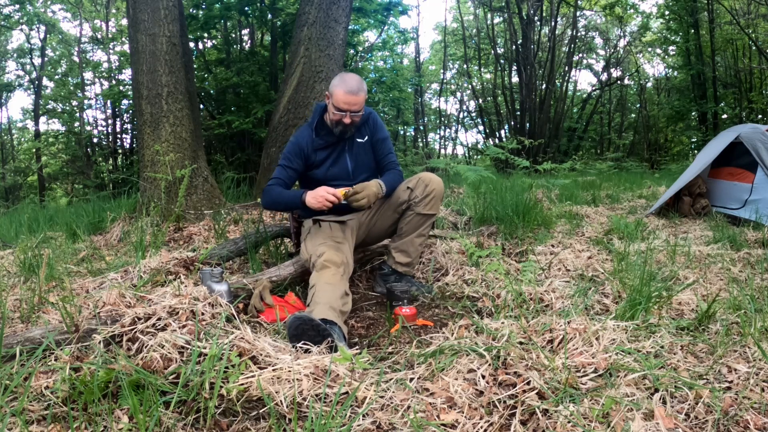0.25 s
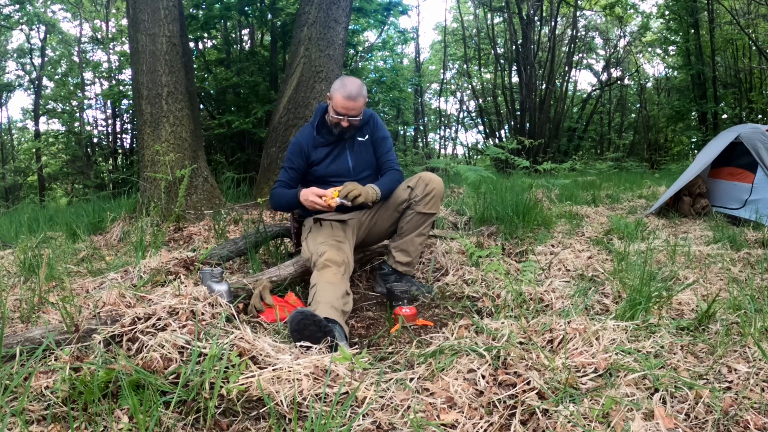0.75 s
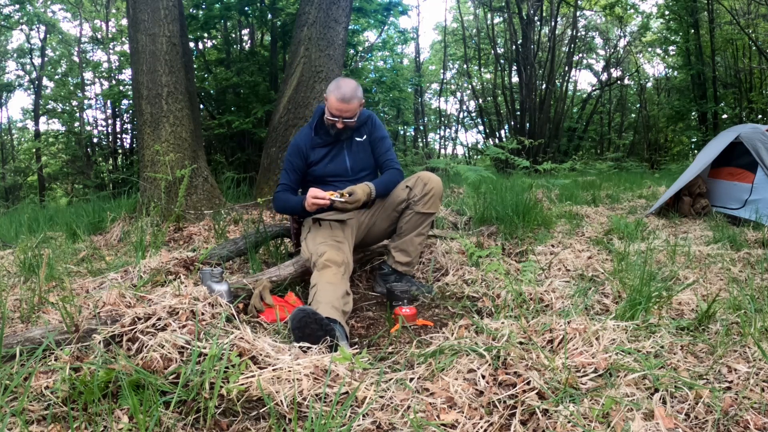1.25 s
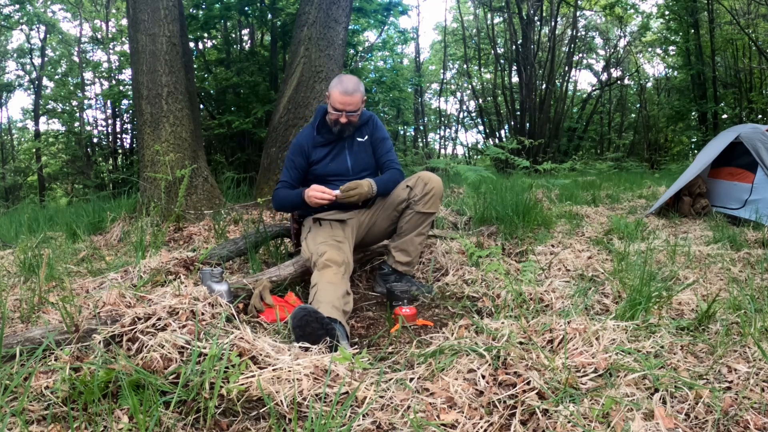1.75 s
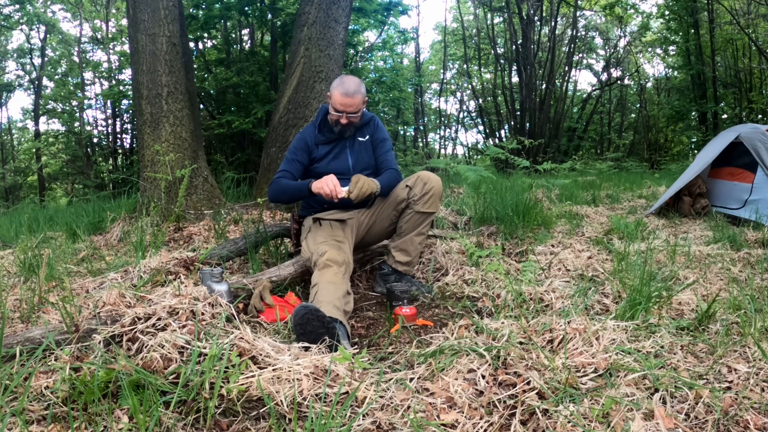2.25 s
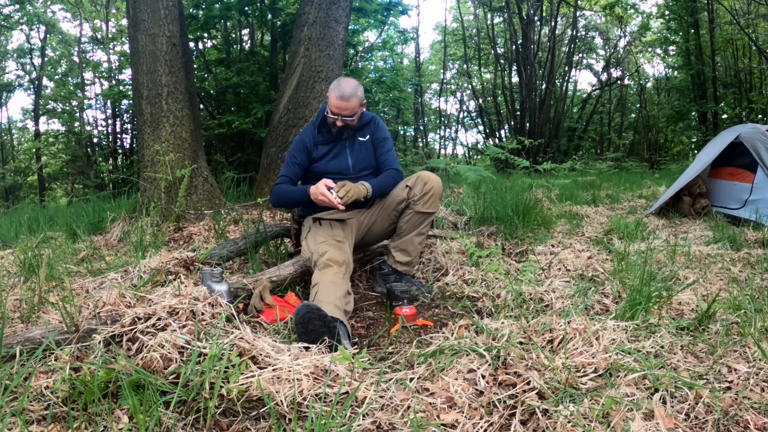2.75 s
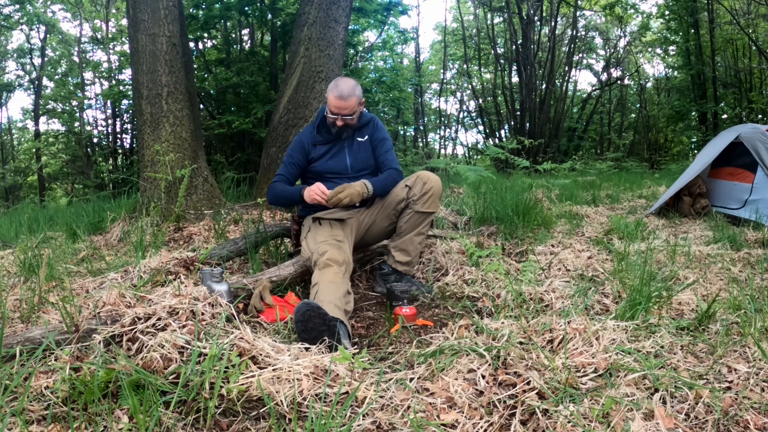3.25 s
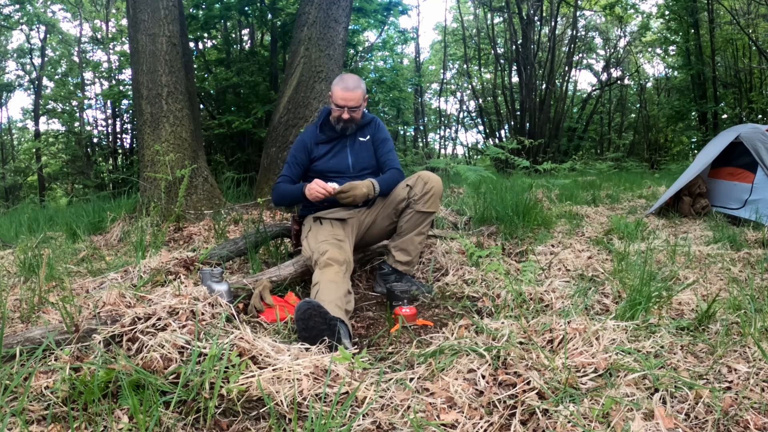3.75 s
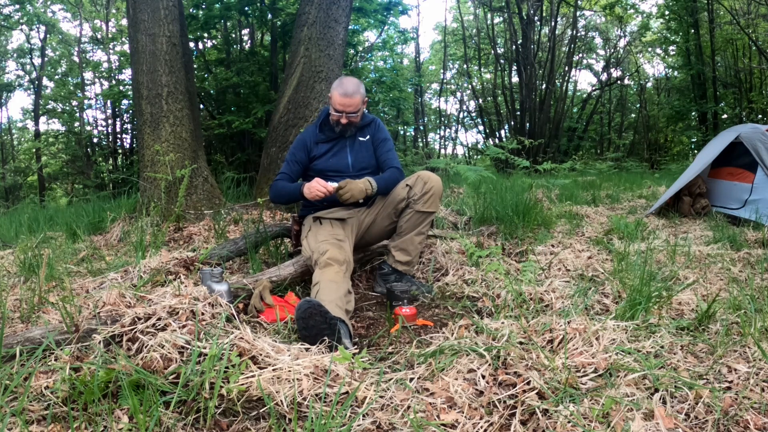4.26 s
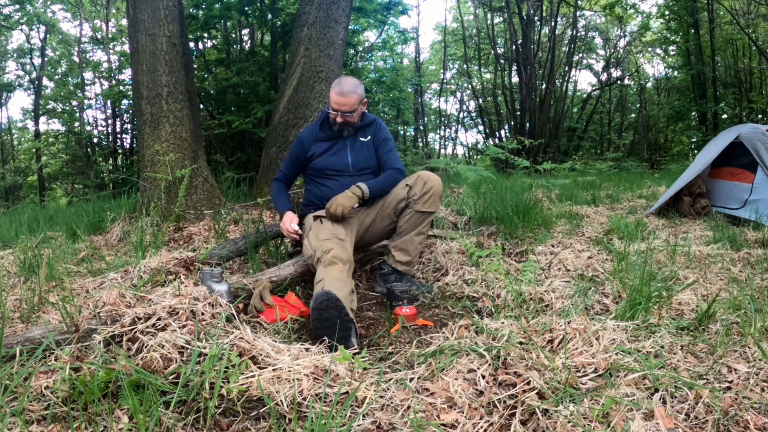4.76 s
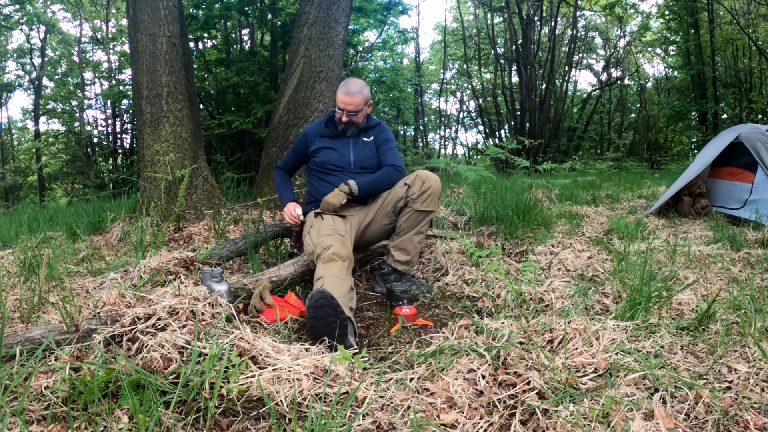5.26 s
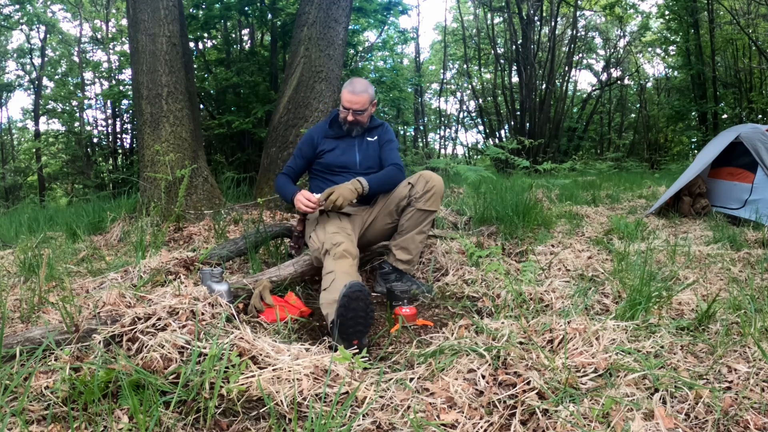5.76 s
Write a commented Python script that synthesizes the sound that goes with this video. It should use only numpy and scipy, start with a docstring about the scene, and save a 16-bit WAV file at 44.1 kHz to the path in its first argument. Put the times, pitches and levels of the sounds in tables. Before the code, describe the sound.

Sharp crinkling of a thin plastic wrapper being folded outdoors, busy at first, fading after four seconds to sparse clicks and soft nylon swishes.

```python
"""Someone in a quiet wood folds and crumples a packet wrapper, a few metres from a small stereo camera.
From the start creases snap as short panel swings and sharp noise ticks, over a crackle of tiny creases.
Diffuse, quickly fading echoes from leaf litter and trunks follow; soft noise thuds are knocks on the knee.
After some four seconds the snaps are few and faint, and from about five a jacket sleeve rustles as noise.
Filtered noise throughout gives still air, a faint distant rumble and a light breeze at the ports."""
import sys
import numpy as np
from scipy import signal
from scipy.fft import rfft, irfft
from scipy.io import wavfile

SR = 44100
rng = np.random.default_rng(int(sys.argv[2]) if len(sys.argv) > 2 else 0)


def write(x):
    x = np.atleast_2d(x).T
    wavfile.write(sys.argv[1], SR, np.round(np.clip(x, -1, 1) * 32767).astype(np.int16))


N = 264600
TIME = np.arange(N) / SR  # s
LEVEL_WINDOW = .003 * SR  # samples over which the level of a short sound is taken

# Light stirring of the film between squeezes, fading as the packet is folded small.
# Each row: time in seconds, panel level in dB before trims.
STIRRING = [(0, -51), (.55, -58), (1.05, -52.5), (1.4, -60.5), (2.05, -65), (2.6, -58.5), (3.2, -65),
            (3.9, -67.5), (4.2, -77), (4.6, -83), (5, -73)]


def undb(db):
    """Decibels to gain."""
    return 10 ** (np.asarray(db) / 20)


def rms(x):
    """Root mean square, kept above zero."""
    return np.sqrt(np.mean(x ** 2)) + 1e-12


def curve(rows, t):
    """Every column of a table after its first, read at times t."""
    s, *columns = np.transpose(rows)
    return [np.interp(t, s, c) for c in columns]


def gains(points, size):
    """Gains of a (Hz, dB) spectrum on the bins of a transform, joined along log frequency."""
    hz, db = np.transpose(points)
    bin_hz = np.arange(size // 2 + 1) * SR / size
    return undb(np.interp(np.log(bin_hz + 1), np.log(hz), db))


def colour(x, points, size=2048):
    """Minimum-phase filter with the given spectrum, so nothing rings early; the overall level is kept."""
    cepstrum = irfft(np.log(gains(points, size)))
    # folding the cepstrum forward makes the filter causal
    cepstrum[1:size // 2] *= 2
    cepstrum[size // 2 + 1:] = 0
    impulse = irfft(np.exp(rfft(cepstrum)))
    y = signal.fftconvolve(x, impulse)[:N]
    return y * rms(x) / rms(y)


def noise(points):
    """Coloured noise with an RMS near 1."""
    return colour(rng.standard_normal(N), points)


def walk(rate):
    """A random wander: straight lines between normal draws, rate draws per second."""
    draws = rng.standard_normal(4096)
    return np.interp(TIME * rate, np.arange(len(draws)), draws)


def effort(strokes, shape, t):
    """Level (dB) of the strongest stroke at times t, and which one it is: each swells, holds and lets go."""
    start, length, db = np.transpose(strokes)[:3]
    swell, slacken, release = shape
    age = t[:, None] - start
    swelling = swell * np.minimum(age, 0)
    slackening = slacken * np.maximum(age, 0)
    letting_go = release * np.maximum(age - length, 0)
    levels = db + swelling - slackening - letting_go
    return levels.max(axis=1), levels.argmax(axis=1)


def wood(air_db=-68.0, rumble_db=-0.5, breeze_db=-82.0, shared=0.44):
    """Still air and a far rumble, partly common to both ports; a light breeze stirs at each port alone."""
    # Far-off rumble. Each row: time in seconds, level in dB before rumble_db and its wander.
    rumble_levels = [(0, -71.5), (3, -70.5), (6, -67.5)]
    # Spectra of the still air and of the rumble. Each row: frequency in Hz, relative level in dB.
    air_spectrum = [(25, -3.5), (90, -10.5), (260, -8), (450, -13), (700, -17.5), (1100, -14.5),
                    (1600, -16), (3000, -17.5), (4200, -23.5), (7000, -22.5), (9500, -35.5), (15000, -43)]
    rumble_spectrum = [(30, -29), (70, -5.5), (120, -14), (158, 2), (210, -4.5), (300, -18), (600, -40),
                       (4000, -71)]
    breeze_spectrum = [(30, -6), (75, -8.0), (130, -39.0), (1500, -71)]

    level_db, = curve(rumble_levels, TIME)
    rumble_gain = undb(level_db + rumble_db + 2.1 * walk(9))
    common, left, right = (undb(air_db) * noise(air_spectrum) + rumble_gain * noise(rumble_spectrum)
                           for _ in range(3))
    breeze_gain = undb(breeze_db + 8.1 * walk(11))
    breeze = breeze_gain * np.array([noise(breeze_spectrum) for _ in range(2)])
    shared = np.clip(shared, 0, 1)
    around = shared * common + np.sqrt(1 - shared ** 2) * np.array([left, right])
    # the right port takes in slightly more of the air and rumble
    return around * undb([[-.9], [.9]]) + breeze


def bumps(decay_s=0.018):
    """Dull, padded knocks of hands and packet on the knee: narrow noise bands that swell and fade."""
    # Each row: start in seconds, level in dB, pitch in Hz that its noise band surrounds.
    knocks = [(.01, -57, 259.7), (.71, -68, 70.4), (0.909, -58.5, 282), (1.19, -67, 169),
              (1.745, -66, 80.13), (1.83, -68, 80.4), (2.075, -65.5, 89.34), (2.485, -67, 171.4),
              (3.2, -71, 85), (3.735, -67, 75.02), (3.83, -69, 74.44), (4.789, -69, 79.9),
              (5.09, -66, 59.7), (5.15, -64.5, 150.4), (5.735, -68.5, 80), (5.829, -61, 154.4),
              (5.91, -64.5, 165)]
    out = np.zeros(N)
    for s, db, hz in knocks:
        age = np.maximum(TIME - s, 0) / decay_s
        band = signal.butter(2, [hz / 1.21, hz * 1.5], "band", fs=SR, output="sos")
        thud = signal.sosfilt(band, rng.standard_normal(N))
        out += undb(db) * age * np.exp(1 - age) * thud / rms(thud)
    return out


def sleeve(db=0.0):
    """Nylon slides on nylon as coloured noise, its level unsteady as it catches a little."""
    # Strokes of the sleeve over the jacket. Each row: start in seconds, length in seconds, level in dB.
    sleeve_strokes = [(5.11, 0.22, -58.5), (5.398, 0.01, -53.5), (5.44, 0.15, -64.5), (5.73, 0.047, -66.5),
                      (5.93, .05, -62.5)]
    # How each stroke swells, slackens while held, and lets go, all in dB per second.
    sleeve_shape = (330, 42, 370)
    # Radiation of the sleeve. Each row: frequency in Hz, relative level in dB.
    sleeve_spectrum = [(300, -32), (650, -13.5), (1150, 1), (1600, -6.5), (3000, -1), (4400, -13),
                       (7000, -5.5), (10000, -27), (15000, -38)]

    level_db, _ = effort(sleeve_strokes, sleeve_shape, TIME)
    catch_db = 2.5 * walk(90) + 3.5 * walk(600)
    return undb(level_db + db + catch_db) * noise(sleeve_spectrum)


def place(times, db, waves):
    """Lay short waves at their times, each with its level taken over 3 ms."""
    energy = np.sum(waves ** 2, axis=1)
    waves = waves * (undb(db) * np.sqrt(LEVEL_WINDOW / energy))[:, None]
    at = np.clip(times * SR, 0, N).astype(int)[:, None] + np.arange(waves.shape[1])
    return np.bincount(at.ravel(), waves.ravel(), N)[:N]


def shiver(times, db, decay_s, lead_s=.0011, size=2048):
    """Power of the film's trembling: it fades after each snap, over a soft symmetric rise around it."""
    kicks = np.bincount(np.clip(times * SR, 0, N).astype(int), undb(db) ** 2, N)[:N]
    t = np.arange(-size, size + 1) / SR
    age = np.maximum(t, 0) / decay_s
    fade = age * np.exp(-2 * np.sqrt(6 * age))
    lead = .016 * np.exp(-np.abs(t) / lead_s)
    shape = fade + lead
    power = signal.fftconvolve(kicks, shape * LEVEL_WINDOW / shape.sum(), "same")
    return np.maximum(power, 1e-16)


def tremble(times, db, hz, width_hz=1250.):
    """Each panel goes on trembling unevenly around its own pitch: low-passed noise on a moving carrier."""
    power = shiver(times, db, decay_s=.0026)
    # where tremblings overlap, the carrier takes their power-weighted mean pitch
    pitch = shiver(times, db + 10 * np.log10(hz), decay_s=.0026) / power
    lowpass = signal.butter(2, width_hz, fs=SR, output="sos")
    unsteady = signal.sosfilt(lowpass, rng.standard_normal((2, N)))
    phase = 2 * np.pi * np.cumsum(pitch) / SR
    carried = unsteady[0] * np.cos(phase) + unsteady[1] * np.sin(phase)
    return np.sqrt(power) * carried / rms(unsteady)


def buckle(times, panel_db, hz, tick_db, cycles, tick_s, tremble_db, size=160):
    """A crease flips: the panel beside it swings briefly and its tip gives a sharp tick of noise."""
    # Radiation of the film's flat panels and of the crease tips.
    # Each row: frequency in Hz, relative level in dB.
    panel_spectrum = [(300, -60), (600, -12), (780, -6.5), (950, 2), (1250, 4), (1550, -0.5), (2000, 3.5),
                      (2600, 2), (3300, 8), (4400, 1.5), (7000, -27)]
    tick_spectrum = [(2000, -28), (3800, -16), (5000, 2), (7200, 3), (8200, -3), (10000, -13), (12000, -17),
                     (15500, -30)]

    t = (np.arange(size) + 1) / SR
    chance = rng.standard_normal((len(times), size + 2))
    hz = np.clip(hz, 800, 5000)
    turns = hz[:, None] * t
    age = turns / (cycles * np.exp(0.83 * chance[:, :1]))
    swing = age * np.exp(-age) * np.sin(2 * np.pi * (turns + chance[:, 1:2]))
    panel = place(times, panel_db, swing)
    tick = place(times, tick_db, chance[:, 2:] * t * np.exp(-t / tick_s))
    fizz = np.sqrt(shiver(times, tick_db + tremble_db + 7.5, decay_s=0.0015))
    # panel and tick reach both ports alike; the noise of the fizz differs at each
    common = colour(panel + tremble(times, panel_db + tremble_db, hz), panel_spectrum)
    return np.array([common + colour(tick + fizz * side, tick_spectrum)
                     for side in rng.standard_normal((2, N))])


def grip(t):
    """Panel level, panel pitch and tick level that the fingers draw from the film at times t."""
    # Squeezes and folds of the fingers. Each row: start in seconds, length in seconds,
    # panel level in dB before trims, panel pitch in Hz before its scatter, ticks over panels in dB.
    squeezes = [(0.0, 0.067, -34.0, 2100, -5), (0.078, 0.17, -43.0, 2567, -4),
                (0.27, 0.081, -40.0, 2460.0, -6), (0.375, 0.055, -42.0, 2803, -4),
                (0.473, 0.035, -45.0, 2880.0, -5), (0.624, 0.06, -47.0, 2734, -5.0),
                (0.7, 0.038, -54.5, 2633, -9), (0.76, 0.13, -45.0, 2548, -6), (0.9, 0.063, -36.5, 2250, -6),
                (1.032, 0.045, -44.0, 2707, -8), (1.115, 0.14, -42.5, 2350.0, -6.0),
                (1.305, 0.047, -50, 2845, -5.5), (1.441, 0.18, -44, 2580, -3),
                (1.742, 0.042, -50.5, 2838, -9), (1.795, 0.045, -41.5, 2059, -5.5),
                (1.875, 0.12, -54, 2656, -2.5), (2.114, 0.035, -49.5, 2548, 0.5),
                (2.18, 0.085, -52.5, 2561, -8), (2.298, 0.075, -49.0, 2138, -6.0),
                (2.389, 0.057, -46, 2488, 2), (2.518, 0.042, -53, 2930, 0), (2.62, 0.17, -52.0, 2605, -3),
                (2.805, 0.085, -46.5, 2205, -2), (2.925, 0.19, -51.5, 2598, -1),
                (3.225, 0.036, -51, 2138, -4.5), (3.337, 0.041, -52, 2552, -3.5),
                (3.395, 0.097, -48.5, 1870, -6.5), (3.515, 0.025, -53.5, 2895, -0.5),
                (3.635, 0.14, -53, 2843, -5.5), (3.814, 0.1, -49, 2521, -0.5),
                (3.92, 0.021, -53, 2260.0, -18), (4.058, 0.037, -63.5, 2574, -8),
                (4.405, 0.018, -64, 2264, -4), (4.759, 0.11, -67.5, 2475, 6.5)]
    # How every squeeze swells, slackens while held, and lets go, all in dB per second.
    squeeze_shape = (700, 15.87, 380)

    squeeze_db, which = effort(squeezes, squeeze_shape, t)
    hz, bright_db = np.array(squeezes)[which, 3:].T
    stirring_db, = curve(STIRRING, t)
    panel_db = np.maximum(squeeze_db, stirring_db)
    return panel_db, hz, panel_db + bright_db


def crackle(count=2600, panel_db=-1.0, tick_db=-4.0, doubling_db=11.):
    """Many tiny creases of uneven size; the harder the fingers press, the faster and louder they give."""
    grid = np.linspace(0, STIRRING[-1][0], 4096)
    # creases per second, doubling with every doubling_db of grip
    rate = 2 ** (grip(grid)[0] / doubling_db)
    rate *= count / (rate.mean() * grid[-1])
    order = np.arange(count) + rng.uniform(-1.5, 1.5, count)
    s = np.interp(order, np.cumsum(rate) * grid[1], grid)
    chance = rng.standard_normal((count, 3)).T
    size_db = 7 * np.minimum(chance[0], 1.3)
    # creases that overlap share the level between them
    overlap = .003 * np.interp(s, grid, rate)
    size_db = size_db - 10 * np.log10(np.mean(undb(size_db) ** 2) * overlap)
    panel, hz, tick = grip(s)
    hz = .96 * hz * np.exp(.32 * chance[1])
    sharp_db = 3.5 * chance[2]
    return buckle(s, panel + size_db + panel_db, hz, tick + size_db + tick_db + sharp_db,
                  cycles=.45, tick_s=.0002, tremble_db=-9)


def pops(count=100, panel_db=3., tick_db=1.5, most_db=-39.5):
    """Middling creases give now and then and stand out of the crackle, unless it is at its thickest."""
    chance = rng.standard_normal((count, 4)).T
    s = (np.arange(count) + .5 + .4 * chance[0]) * STIRRING[-1][0] / count
    panel, hz, tick = grip(s)
    size_db = 2 * chance[1]
    sharp_db = 3 * chance[2]
    hz = hz * np.exp(.17 * chance[3])
    # hold the panel level, before its random size, to most_db
    size_db = size_db + np.minimum(most_db - panel - panel_db, 0)
    return buckle(s, panel + panel_db + size_db, hz, tick + tick_db + size_db + sharp_db,
                  cycles=.47, tick_s=.0002, tremble_db=-12)


def neighbours(s, panel, hz, tick):
    """Each large crease sets off a small, usually lower one beside it, a millisecond or so later."""
    chance = rng.standard_normal((len(s), 3)).T
    size_db = -12 + 2.5 * chance[1]
    lag_s = .0015 * np.abs(chance[0])
    hz = 0.71 * hz * np.exp(0.32 * chance[2])
    return buckle(s + lag_s, panel + size_db, hz, tick + size_db,
                  cycles=0.32, tick_s=0.00014, tremble_db=-7.5)


def snaps(panel_db=0.15, tick_db=-1.5):
    """The large creases buckle one by one, with the small ones that they set off."""
    # Each row: time in seconds, panel level in dB, panel pitch in Hz, tick level in dB,
    # both levels before the trims above.
    creases = [(0.0376, -27, 1201, -41), (0.0493, -28.5, 3115, -38.5), (0.059, -32.0, 2700, -48.0),
               (0.0887, -32.0, 1390, -51.5), (0.1461, -34, 2282, -53), (0.2039, -36.0, 2845, -45.5),
               (0.245, -42, 2520, -44.5), (0.2751, -34.0, 1605, -37), (0.331, -38.0, 2590, -44),
               (0.3476, -36, 2118, -48), (0.3845, -38.0, 3127, -47.0), (0.4055, -38.5, 2877, -39.0),
               (0.4462, -33.0, 2876, -42.5), (0.4788, -41.5, 3430, -41), (0.4916, -29.5, 3336, -40),
               (0.5144, -39, 3120, -56), (0.5802, -39.5, 2575, -45), (0.5943, -48, 2548, -45),
               (0.6318, -40.0, 2005, -48), (0.6708, -42, 1971, -51), (0.6778, -41, 3151, -51),
               (0.7009, -43.0, 2883, -42.5), (0.7247, -46.5, 2882, -46), (0.7797, -30.5, 2454, -38),
               (0.7972, -37.5, 2000, -44), (0.843, -39, 2448, -49.5), (0.863, -38, 3060, -47.5),
               (0.9235, -28, 2982, -39.5), (0.9385, -32.5, 1991, -36), (0.9743, -37.5, 2649, -34),
               (1.036, -35.5, 3130, -36.5), (1.054, -41, 2781, -45.0), (1.0718, -34.5, 2459, -62),
               (1.1073, -36.5, 2569, -40.5), (1.1241, -29, 2300, -35.5), (1.1312, -30, 2003, -48),
               (1.141, -24, 1699, -24), (1.1915, -39.5, 2598, -45.5), (1.2199, -37.5, 3470, -40),
               (1.2491, -38, 2290, -37), (1.2615, -39.5, 2585, -33), (1.3281, -51.5, 3370, -37),
               (1.345, -43.5, 2490, -52), (1.4161, -37.5, 3045, -52), (1.4338, -33.5, 2575, -40.5),
               (1.4525, -34.5, 2889, -54.5), (1.4637, -37.5, 2904, -37.5), (1.4765, -33, 2733, -38),
               (1.5234, -35.5, 2973, -36), (1.5359, -35.5, 2924, -34), (1.5487, -39, 3296, -50),
               (1.5792, -35, 2254, -31.5), (1.6015, -37.5, 1900, -50.0), (1.6322, -45.5, 2292, -47.5),
               (1.6817, -45, 2050, -44), (1.7528, -42.5, 3466, -47.5), (1.777, -44, 2556, -49),
               (1.8025, -38.0, 3175, -36.5), (1.8353, -30.5, 1499, -38), (1.8789, -40.0, 2763, -49),
               (1.9846, -48.0, 2836, -60), (2.0613, -50.5, 2860, -47), (2.0866, -50.5, 1948, -50),
               (2.1137, -36.5, 2547, -34.5), (2.1303, -42.5, 3048, -46), (2.1926, -39, 3550, -39),
               (2.2572, -45.5, 2944, -49.5), (2.3071, -43.5, 2723, -51), (2.3553, -37.5, 2811, -43.5),
               (2.4213, -42, 2098, -44), (2.4401, -34, 1949, -36), (2.4689, -52.5, 2494, -43.5),
               (2.5221, -51, 2470, -45.5), (2.5996, -42.5, 3020, -42.5), (2.6355, -44.5, 2712, -45.5),
               (2.6606, -50, 2959, -54), (2.725, -42.5, 2628, -42), (2.7314, -41, 2573, -39),
               (2.7535, -45.5, 2972, -43), (2.7845, -44.5, 2297, -47.0), (2.8189, -39.5, 2825, -53.5),
               (2.8874, -39.5, 3200, -47), (3.0539, -51, 3608, -47), (3.1335, -47, 3143, -52.0),
               (3.1771, -44.5, 2254, -55.5), (3.2298, -43.5, 2467, -52), (3.4791, -37.5, 1345, -42.5),
               (3.526, -48.5, 2930, -52), (3.6036, -59, 2734, -45.5), (3.6434, -46, 3065, -43),
               (3.687, -49.0, 3173, -45.5), (3.7213, -49.5, 2400, -51), (3.7512, -40.5, 1473, -42),
               (3.7825, -33.5, 3335, -45.5), (3.8365, -41.0, 2270, -37.5), (3.889, -46, 2752, -44),
               (3.9088, -39.5, 2002, -40), (3.9781, -56, 1926, -51), (3.9886, -41.5, 2050, -42),
               (3.9971, -52, 2085, -58), (4.0183, -53, 1883, -57), (4.0537, -49.5, 2640, -49),
               (4.0797, -52.5, 3060, -45.0), (4.0889, -58, 2710, -59), (4.1432, -65, 2940, -61.5),
               (4.251, -59.5, 2290, -63.5), (4.2923, -57.5, 3040, -53), (4.3946, -58.5, 3256, -46),
               (4.4239, -60, 2830, -58), (4.5097, -48, 2784, -46.5), (4.7107, -55.0, 2438, -48.5),
               (4.7685, -57, 2556, -71), (4.8196, -64, 3490, -54), (4.8559, -55.5, 3265, -40),
               (4.8753, -65.0, 2863, -54.5), (4.914, -53, 3423, -51.5), (5.1951, -53, 2870, -48.5),
               (5.2989, -54.0, 2610, -56), (5.4092, -50, 2140, -70), (5.72, -50.5, 2760, -54.5),
               (5.9385, -54.5, 2820, -50.5)]
    s, panel, hz, tick = np.transpose(creases)
    panel, tick = panel + panel_db, tick + tick_db
    large = buckle(s, panel, hz, tick, cycles=.55, tick_s=.00025, tremble_db=-11)
    return large + neighbours(s, panel, hz, tick)


def scatter(x, db, delay_s, decay_s, count=5, size=12000):
    """A diffuse, dying echo: random noise patterns crossfade in turn, so its colour keeps varying."""
    t = np.arange(size) / SR
    turn = TIME * 23  # patterns per second
    out = np.zeros(N)
    for k in range(count):
        share = np.clip(1 - np.abs((turn - k + 1) % count - 1), 0, 1)
        uneven = rng.standard_normal(size) * undb(1.6 * rng.standard_normal(size))
        echo = uneven * np.exp(-t / decay_s) * (t > delay_s)
        echo = echo / np.sqrt(np.sum(echo ** 2))
        out += signal.oaconvolve(x * np.sqrt(share), echo)[:N]
    return undb(db) * out


def ports(x):
    """Two microphone ports: the left hears a little later and, in the treble, duller."""
    # Shading of the left port. Each row: frequency in Hz, left minus right in dB.
    left_shade = [(100, 4), (380, -3.5), (1300, -1.5), (2500, 2.5), (4400, 1), (6000, -12.5), (8500, -16.5),
                  (12000, -6), (15000, -11)]
    lag = 3  # samples
    left = irfft(rfft(x[0]) * gains(left_shade, N), N)
    return np.array([np.pad(left, (lag, 0))[:N], x[1]])


def scene():
    """The wrapper, sleeve and bumps, their echoes from ground and trees, and the wood behind."""
    near = snaps() + pops() + crackle() + sleeve() + bumps()
    # ground litter in front answers at once; the trunks all round answer later, differently at each port
    ground = scatter(near[1], db=-15.5, delay_s=.002, decay_s=.014)
    trunks = np.array([scatter(side, db=-16.5, delay_s=0.016, decay_s=0.028) for side in near])
    return undb(-1.0) * ports(near + ground + trunks) + wood()


def record(dry):
    """The camera cuts the top with a steep low-pass."""
    top_hz = 15800
    return signal.sosfilt(signal.ellip(8, .2, 70, top_hz, fs=SR, output="sos"), dry)


dry = scene()
out = record(dry)
write(out)
```